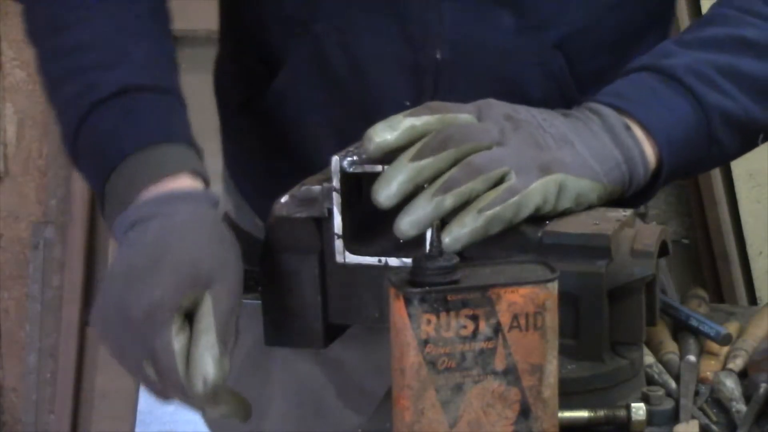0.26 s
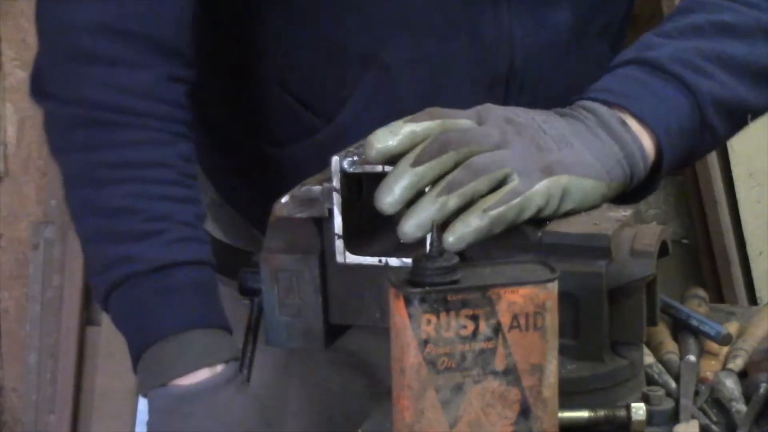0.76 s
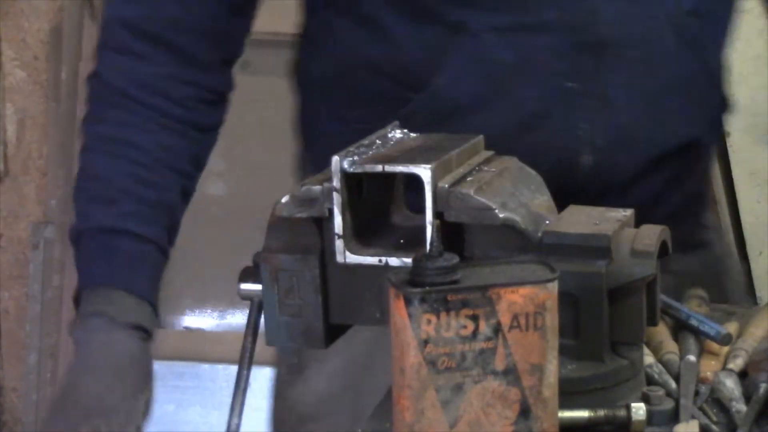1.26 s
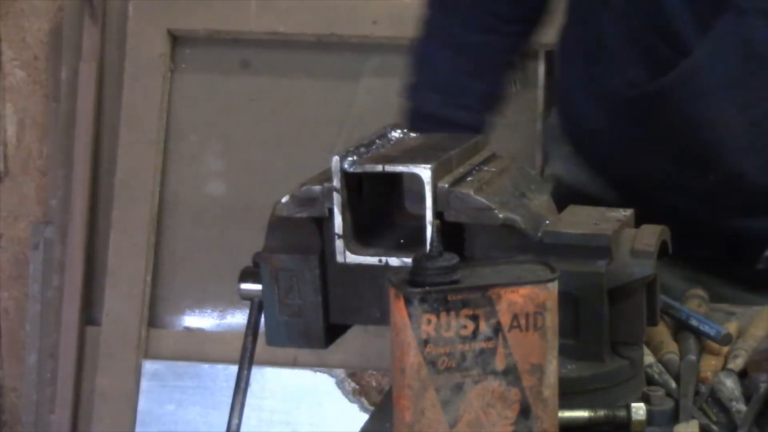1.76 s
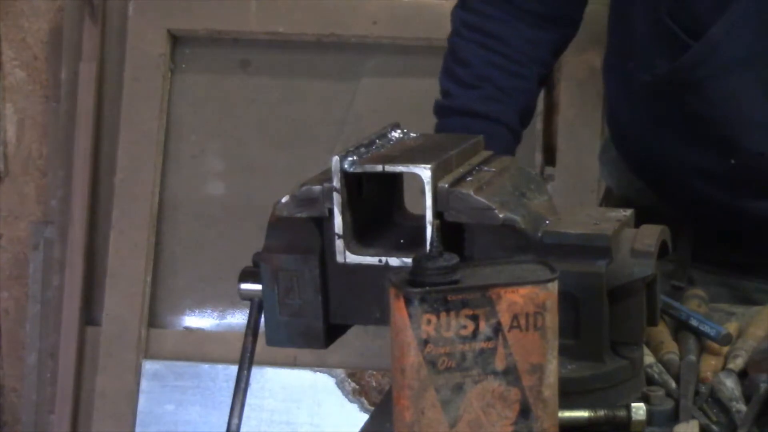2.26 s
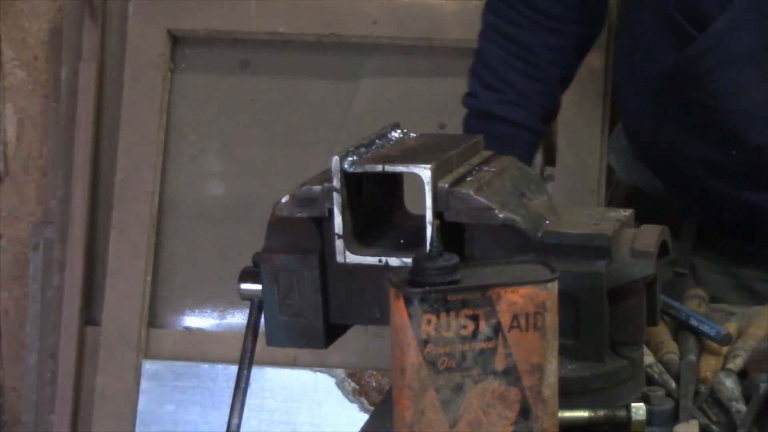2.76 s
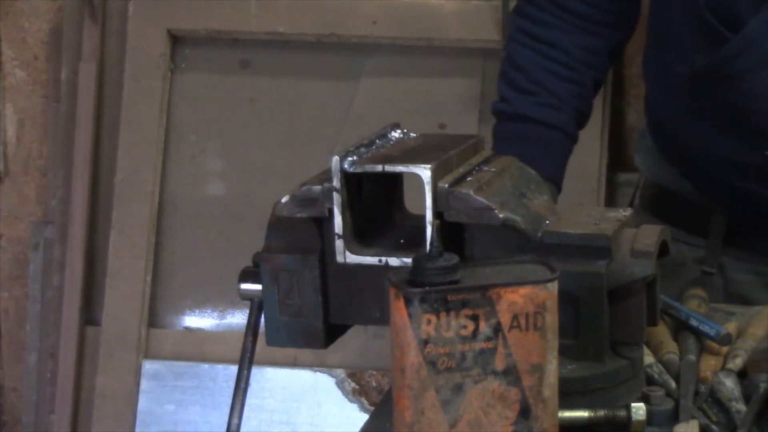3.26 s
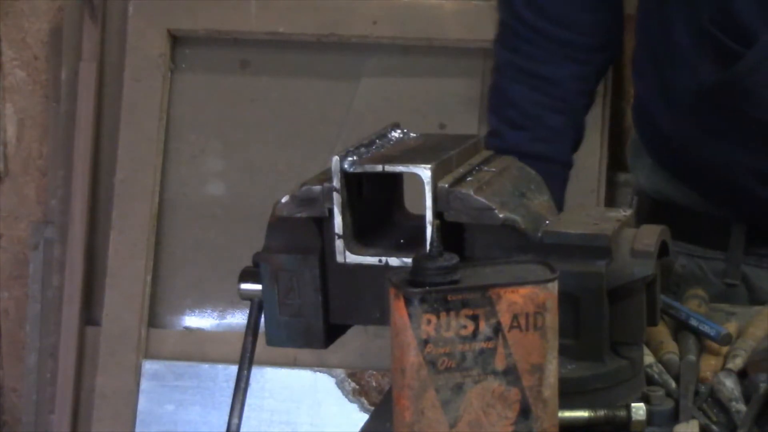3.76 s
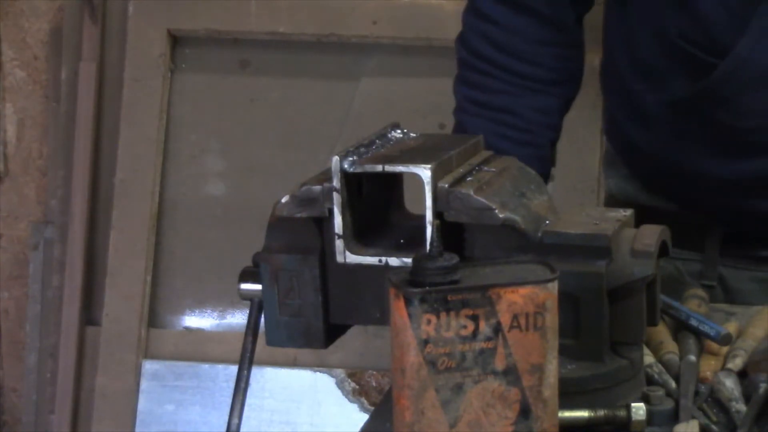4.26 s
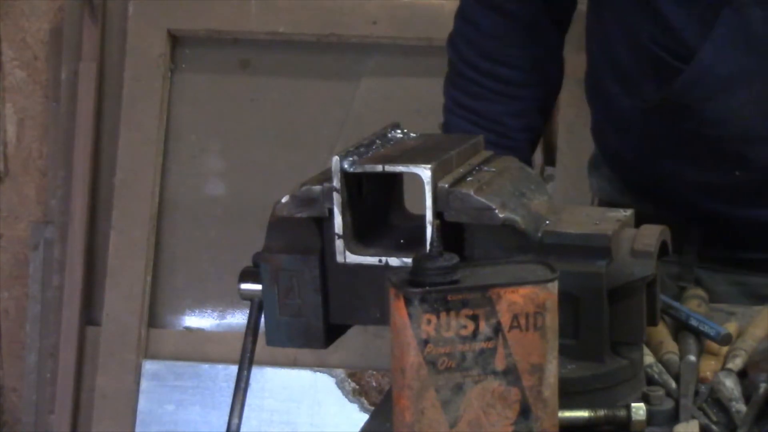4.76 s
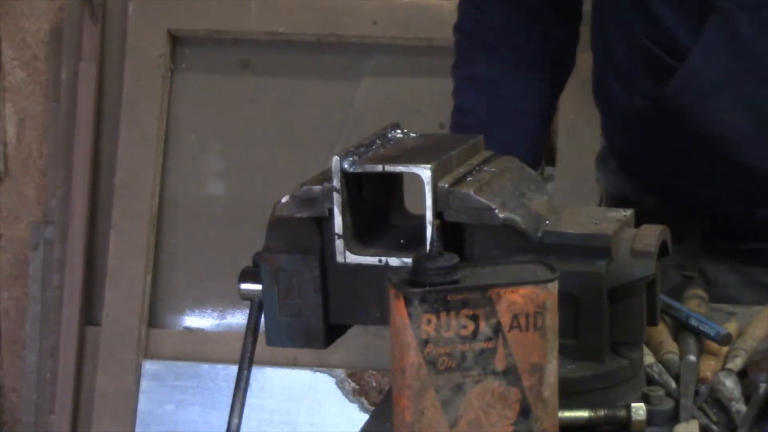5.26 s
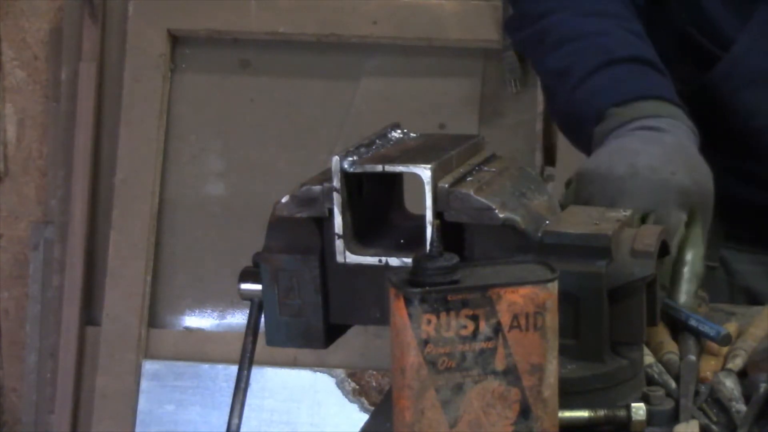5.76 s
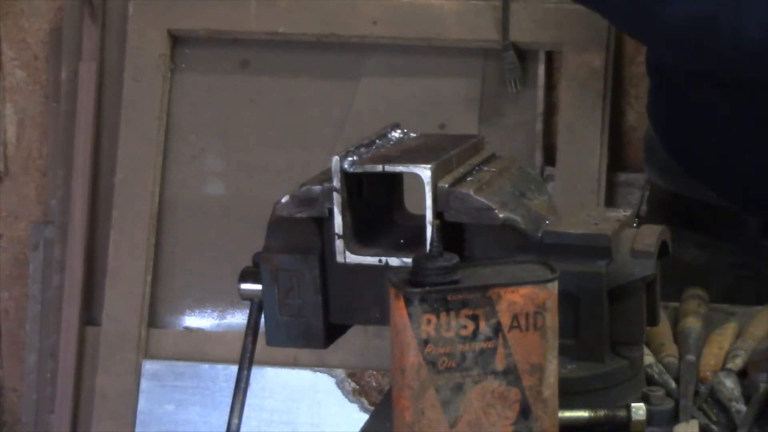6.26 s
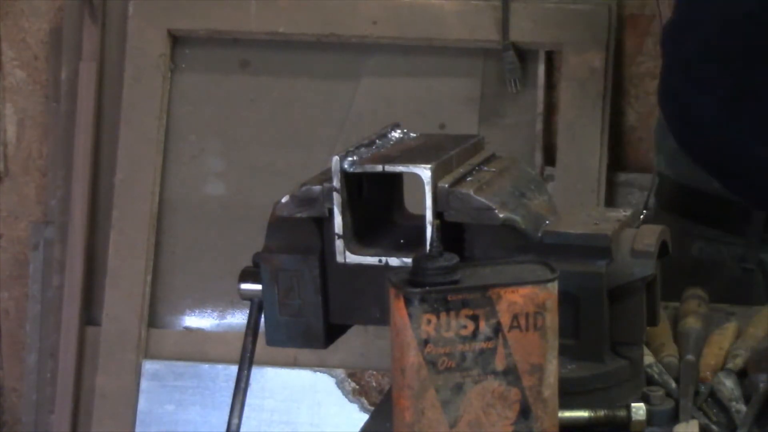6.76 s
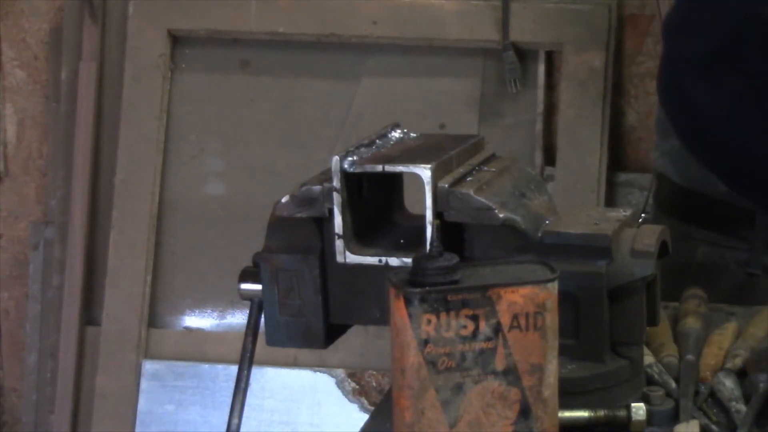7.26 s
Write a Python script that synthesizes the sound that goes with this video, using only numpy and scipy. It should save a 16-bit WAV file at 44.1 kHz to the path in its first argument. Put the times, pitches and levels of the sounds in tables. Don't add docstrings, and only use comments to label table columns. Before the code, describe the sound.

Faint rustles and ticks, then knocks on a wooden bench, a ringing tool set down, and a heavy crash of metal offcuts at the end.

```python
import sys
import numpy as np
from scipy import signal
from scipy.io import wavfile

SR = 44100
rng = np.random.default_rng(int(sys.argv[2]) if len(sys.argv) > 2 else 0)


def master(y):
    cut = np.clip(np.atleast_2d(y).T, -1, 1)
    pcm = np.round(cut * 32767)
    wavfile.write(sys.argv[1], SR, pcm.astype(np.int16))


def volts_from_db(level):
    exponent = np.asarray(level, float) / 20
    return 10 ** exponent


N = 331191


def at_hz(points, hz):
    f, value = np.array(points)[:, 0], np.array(points)[:, 1]
    return np.interp(np.log(hz), np.log(f), value)


def blend(zones_hz, columns, hz):
    shares = [np.interp(np.log(hz), np.log(zones_hz), row) for row in np.eye(len(columns))]
    return sum(share * column for share, column in zip(shares, columns))


def fine_colour(points, zones_hz, hz):
    return at_hz(points, hz) - blend(zones_hz, at_hz(points, zones_hz), hz)


def rms_one(x):
    return x / np.sqrt(np.mean(x ** 2) + 1e-20)


def drift(rate):
    step = int(SR / rate / 2)
    knots = rng.standard_normal(N // step + 2)
    return np.interp(np.arange(N) / step, np.arange(len(knots)), knots)


def ring(x, hz, t60):
    r, w = volts_from_db(-60 / (t60 * SR)), 2 * np.pi * hz / SR
    return signal.lfilter([0, np.sin(w)], [1, -2 * r * np.cos(w), r * r], x + 1e-18)


def contacts():
    # t/s, level/dB, brightness/dB, sharpness of the first crack/dB
    thumps = [
        (2.337, -30, -14, 9.5),
        (3.245, -31, 2, 2),
        (3.915, -36, 0, -12),
        (4.076, -36.5, -6, -14),
        (4.245, -37.5, 0, 5),
        (7.014, -3.5, 1, -9),
        (7.151, -24, 26, -3),
    ]
    knocks = [(0.317, -34.5, 9, 0), (1.892, -15, 3.5, -15), (2.717, -8.5, -5, 6), (3.428, -24, 3, 7),
              (3.68, -18.5, -5.5, 8.5), (4.95, -22.5, 9, 4.5), (5.439, -28.5, 2, 8.5), (6.632, -40, -22, 9),
              (6.879, -23.5, 12, -2), (6.938, -15.5, 1, -4), (7.084, -12, -2.5, 8.5),
              (7.324, -14, -14, 6.5), (7.363, -10, 10.5, 11.5), (7.432, -7, 0, 1)]
    raps = [(1.456, -35, 10.5, -9), (2.503, -34.5, 7, -3), (3.123, -28, -13, -5), (3.131, -28, 0, 5),
            (3.482, -21.5, -9, -8), (5.027, -25, -2, -14), (5.082, -20, -7, 4), (5.203, -20.5, 3, 9.5),
            (5.4, -34, 0.5, 1), (5.657, -33.5, -8, -10), (6.815, -18.5, -14, 4.5), (6.963, -13.5, 7, 7),
            (6.991, 4, -19, 3), (7.262, -27.5, 5.5, 1)]
    clanks = [
        (0.22, -27, -6, 6.5),
        (0.819, -33, -11, 8.5),
        (1.164, -34.5, -8.5, -6),
        (3.321, -40.5, 2, -2),
        (3.573, -32, 10.5, 10),
        (4.974, -22, 10.5, -5),
        (6.904, -18, -6, 5),
        (7.458, -17.5, -1.5, 12),
        (7.493, -28, -8, 8),
    ]
    ticks = [(1.527, -35, -7, -14), (2.522, -36.5, 2, -7), (5.586, -50, 1, 5), (6.059, -56, 12.5, 4),
             (6.101, -53, 7, 10), (6.136, -55, 0, 4), (6.7, -57, 10.5, -8), (6.878, -41, 8, 3),
             (6.815, -50, 10, 8), (.185, -56, 8, 3), (7.4535, -30.5, 7, 9), (7.012, -36.5, 5, 7),
             (2.644, -43.5, 5, 2), (7.288, -23, -2.5, 8), (7.301, -19.5, -2.5, 7.5)]
    thump_db = [0, -11.5, -43, -41]
    knock_db = [-10, 0, -15, -21.5]
    rap_db = [-20.5, -0.5, -12, -23]
    clank_db = [-8, -6, -3, -13]
    tick_db = [-11.5, -3, -1.5, -1]
    bright_shares = np.array([-0.057, 0.022, 0.45, 0.98])
    kinds = ((thumps, thump_db), (knocks, knock_db), (raps, rap_db), (clanks, clank_db), (ticks, tick_db))
    table = []
    for rows, kind_db in kinds:
        for s, db, bright_db, sharp_db in rows:
            zone_db = db + np.array(kind_db) + bright_db * bright_shares
            table.append((s, sharp_db, *zone_db))
    return np.array(table)


def knock_envelope(hz, early_s, rise_cycles):
    zones_hz = [200, 800, 2800, 8000]
    # f/Hz, level/dB per Hz
    knock_colour = [(60, -40), (110, -11.5), (170, 0.5), (350, 6), (800, 0.5), (1400, -6.5), (2200, -15.5),
                    (4500, -22), (8000, -22), (12000, -33.5), (15500, -60)]
    # f/Hz, t60/s
    tail_t60 = [(100, 0.58), (260, 0.29), (700, 0.29), (1800, 0.29), (5000, 0.36), (12000, 0.09)]
    table, out, t = contacts(), np.zeros(N), np.arange(SR // 3) / SR
    level_db = blend(zones_hz, table[:, 2:].T, hz) + fine_colour(knock_colour, zones_hz, hz)
    sharp_db = table[:, 1]
    rise = 1 - np.exp(-t * hz / rise_cycles)
    tail = (volts_from_db(-60 * t / at_hz(tail_t60, hz)) * rise) ** 2
    burst = np.exp(-2 * t[:1000] / (early_s + 0.62 / hz))
    starts = (table[:, 0] * SR).astype(int)
    for i, power, hard in zip(starts, volts_from_db(2 * level_db), volts_from_db(2 * sharp_db)):
        out[i:i + len(t)] += power * tail[:N - i]
        out[i:i + 1000] += power * hard * burst[:N - i]
    return np.sqrt(out)


def struck(body, level_db, damping):
    blows, modes = body
    at, out = [int(s * SR) for s, db in blows], np.zeros(N)
    blow_db = np.array(blows)[:, 1]
    luck = rng.standard_normal((len(blows), 30))
    for k, (hz, mode_db, t60) in enumerate(modes):
        clicks = np.zeros(N)
        clicks[at] = volts_from_db(blow_db + mode_db + level_db + 2.0 * luck[:, k]) * (-1) ** k
        out += ring(clicks, hz, np.clip(t60 * damping, .02, .9))
    return out


def wood():
    # (f/Hz, level/dB, t60/s)
    board = [(1.892, -13), (3.681, -20.5), (5.44, -24.5)], [(189, -6, 0.35), (497.5, 1.5, 0.18),
             (540, -1, 0.3), (565, -6.5, 0.59), (625, -9, 0.19), (890, -19, 0.33), (1034, -7, 0.12)]
    drawer = [(2.334, -31.5), (2.7165, -5.5)], [(209.6, -4.5, 0.39), (313.2, -1.5, 0.54), (383, 2, 0.24),
              (543, -3.5, 0.2), (624, -3, 0.24), (980, -12, 0.19), (1360, -14, 0.23), (1453, -1.5, 0.076),
              (452, -6, 0.2), (270, -2, .3)]
    bench = [(6.992, 0), (7.084, -31), (7.362, -6), (7.436, -17)], [(149.6, -22, 0.95), (324.6, 3, 0.46),
             (644, 1.5, 0.21), (997, 1, 0.17), (1086, -5, 0.54), (1317, 3, 0.083), (1450, -4, 0.25),
             (1480, -5, 0.38), (767, 3.5, 0.25), (1567, -10, 0.31), (2022, -15, 0.79)]
    block = [(3.131, -29), (6.815, -14.5)], [(1054, 4, 0.071), (1310, 5.5, 0.047), (1540, -1, 0.099),
             (2010, -4, 0.05)]
    frame = [(2.716, -24), (5.084, -30.5), (6.99, -6), (7.362, -17.5)], [(93.2, -14.5, 0.89),
             (152, -12, 0.96), (186, -10, 0.34)]
    out = struck(board, level_db=-11.0, damping=0.62)
    out += struck(drawer, level_db=-14.0, damping=0.64)
    out += struck(bench, level_db=-14.5, damping=0.41)
    out += struck(block, level_db=-8.5, damping=0.21)
    out += struck(frame, level_db=-5.0, damping=0.58)
    return out


def steel():
    # (f/Hz, level/dB, t60/s)
    spanner = [(4.9511, -24), (4.9736, -5), (5.028, -14.5), (5.0833, -35)], [(470, -4.5, 0.098),
               (865, -7, 0.22), (1441, -0.5, 0.2), (2013, -10, 0.37), (3050, -2, 0.059), (3190, -7.5, 0.23),
               (4100, -5.5, 0.11), (4200, -9, 0.15), (5300, -15, 0.22), (5970, -11, 0.16),
               (6620, -11.5, 0.11), (8600, -22, 0.14)]
    rod = [(3.4286, -21.5)], [(980, 5, 0.077), (2065, 1, 0.3), (3750, -19, 0.12), (4540, -15, .06),
           (5850, -12, 0.07), (6320, -11, 0.064)]
    plate = [(3.5743, -22.5)], [(3200, -2.5, 0.18), (3930, -1.5, 0.13), (4883, -1.5, 0.16), (5060, -7, .2),
             (5900, -9, .1), (7030, -2, 0.07)]
    offcuts = [(6.9052, -17.5), (6.9636, -12), (7.2883, -14), (7.2998, -6.5), (7.3627, -2.5),
               (7.4594, -17)], [(2970, -9, 0.1), (3980, -0.5, 0.038), (4900, -12, 0.053),
               (5740, -1.5, 0.054), (6210, -7, 0.067), (6740, -7.5, 0.038), (7800, -9, 0.036)]
    socket = [(0.2209, -40.5), (2.507, -43), (2.5202, -33.5)], [(2870, -6, 0.33), (3010, 0, 0.27),
              (4200, -2, 0.26), (5330, -1.5, 0.21), (7670, -8, .15)]
    bolt = [(5.205, -17.5)], [(1133, -0.5, 0.12), (2154, -2, 0.063), (3160, -9, 0.15), (4290, -13, 0.1),
            (865, -4, 0.13)]
    washer = [(5.5852, -44)], [(2320, -1, 0.12), (4150, -1, 0.13), (5350, -5, .15)]
    pipe = [(5.045, -37)], [(3722, 0, 2.0), (3738, -10, .6), (3200, -11, .5)]
    out = struck(spanner, level_db=-17.0, damping=0.67)
    out += struck(rod, level_db=-12.0, damping=0.92)
    out += struck(plate, level_db=-8.0, damping=0.35)
    out += struck(offcuts, level_db=-12.5, damping=0.37)
    out += struck(socket, level_db=-12.0, damping=0.56)
    out += struck(bolt, level_db=-7.5, damping=0.44)
    out += struck(washer, level_db=-8.5, damping=0.68)
    out += struck(pipe, level_db=-3.5, damping=0.7)
    return out


def juddering_box():
    # (f/Hz, level/dB, t60/s)
    box = [(7.325, -13), (7.349, -17), (7.392, -11), (7.407, -12.5), (7.432, -14), (7.442, -14),
           (7.452, -11)], [(437, 1.5, .06), (245, -6, .08), (540, -3, .06)]
    return struck(box, level_db=-2.5, damping=0.97)


def pings():
    # t/s, f/Hz, peak level/dB, t60/s
    small_rings = [(.8195, 2860, -39, .03), (0.82, 1760, -42, .03), (.8195, 2560, -38, .04),
                   (.8195, 4900, -43, 0.027), (0.8197, 410, -43, 0.07), (2.337, 470, -37.5, .15),
                   (2.529, 8900, -48, .05), (2.529, 7520, -46, .12), (2.645, 12200, -54, .06),
                   (2.529, 11000, -50, .03), (2.648, 8000, -47, .05), (2.65, 10500, -50, .05),
                   (2.702, 1396, -27, .05), (2.7013, 3020, -34, .03), (2.7165, 2740, -22, 0.023),
                   (2.8011, 3417, -37.5, 0.071), (3.444, 1500, -43, .06), (3.505, 893, -28.5, 0.04),
                   (3.507, 3750, -38, 0.046), (3.64, 956, -40, .1), (3.682, 6000, -41, .03),
                   (3.575, 4950, -35, .12), (4.95, 1460, -32, .06), (5.028, 1466, -30, .1),
                   (5.028, 3070, -30, .05), (5.025, 5970, -39, .1), (5.199, 3700, -30, .03),
                   (5.036, 880, -29, 0.13), (5.083, 1096, -25, 0.047), (5.403, 1650, -44, .06),
                   (5.441, 603, -29.5, 0.055), (5.442, 2800, -43, .02), (5.442, 4900, -42, .02),
                   (5.442, 5950, -51, .02), (5.672, 2330, -46, .06),
                   (6.8917, 2200, -34, .05), (6.897, 3080, -38, .05), (6.907, 4200, -31, .04),
               (6.918, 3700, -28, .03), (6.915, 6900, -39, 0.063), (6.955, 5700, -33, .06),
               (6.972, 6100, -28, .02), (6.9905, 2930, -19.5, .02), (6.9905, 4100, -24, .02),
               (7.012, 8000, -34, 0.044), (7.012, 6300, -30, .04), (7.263, 1060, -32.5, .06),
               (7.3002, 4700, -20, 0.046), (7.305, 1480, -22, 0.045), (7.308, 5800, -27.5, 0.054),
               (7.366, 6320, -17, 0.045), (7.363, 8200, -29, .04), (7.454, 6130, -26, 0.043),
               (7.4597, 2710, -21, .05), (7.4924, 3500, -24, .04), (7.4924, 1930, -24.5, .04)]
    spacing = .013
    out, t = np.zeros(N), np.arange(SR // 4) / SR
    for s, hz, level_db, t60 in small_rings:
        i = int(s * SR)
        cluster = 0
        for k, gain in ((-1.6, .35), (0, .5), (1, .35)):
            cluster = cluster + gain * np.sin(2 * np.pi * hz * (1 + spacing * k) * t)
        decay = volts_from_db(level_db - 60 * t / np.clip(t60, .01, .12))
        out[i:i + len(t)] += (decay * cluster)[:N - i]
    return out


def rattle(per_s, cycles, quiet_db, level_db):
    knocked = volts_from_db(-4.0) * knock_envelope(4500, early_s=0.0014, rise_cycles=29.0)
    shaking = volts_from_db(sliding()[2]) + knocked
    shaking = np.maximum(shaking - volts_from_db(quiet_db), 0)
    happens = rng.random(N) < per_s / SR
    sizes = volts_from_db(2.2 * np.minimum(rng.exponential(1, N), 3)) * shaking * happens
    dealt = rng.integers(0, 30, N)
    pitches = np.geomspace(1500, 13000, 30) * volts_from_db(.3 * rng.standard_normal(30))
    out = np.zeros(N)
    for k, hz in enumerate(pitches):
        out += ring(sizes * (dealt == k), hz, cycles / hz) * (3000 / hz) ** 0.4
    return volts_from_db(level_db) * out


def sliding():
    # t/s, length/s, level/dB, weight/dB, brightness/dB
    slides = [(0.24, .28, -58, -8, 19), (0.59, 0.17, -65, -6, 24.5), (0.809, 0.13, -48.5, -16, 16),
              (2.475, 0.17, -35, 2, 2), (2.573, 0.15, -34.5, -9, -2), (2.76, 0.09, -51, 7, 1),
              (3.09, 0.21, -49.5, 9, 3), (3.254, 0.12, -49, 1, 7), (3.452, .14, -32.5, -3.5, 3),
              (4.879, 0.082, -39.5, -8, 2), (5.018, 0.076, -35, -2, -11), (5.083, 0.14, -44.5, 10.5, 10),
              (5.5, 0.14, -56, 3, 13.5), (6.66, 0.27, -60, 1, 18), (6.88, 0.17, -22.5, -4, -4.5),
              (7.06, 0.14, -38.5, 0, -2), (7.14, 0.13, -48.5, 7, 8), (7.371, 0.1, -34, 15, 10)]
    # t/s, level/dB
    stir = [
        (0, -55),
        (1.6, -54),
        (3.9, -57),
        (5.2, -60),
        (7.51, -57),
    ]
    swell_share, swell_db, let_go_db_per_s, hiss_db = 0.66, 23, 197, -15.5
    t = np.arange(N) / SR
    stir_s, stir_db = np.transpose(stir)
    power = volts_from_db(2 * (np.interp(t, stir_s, stir_db) + np.array([[1], [0], [hiss_db + 0.7]])))
    for s, length, db, weight_db, bright_db in slides:
        near = slice(max(int((s - .1) * SR), 0), int((s + length + .4) * SR))
        rise_db = swell_db * np.minimum((t[near] - s) / (swell_share * length) - 1, 0)
        shape_db = rise_db - let_go_db_per_s * np.maximum(t[near] - s - length, 0)
        zone_db = np.array([[weight_db], [0], [hiss_db + bright_db]])
        power[:, near] += volts_from_db(2 * (db + shape_db + zone_db))
    return 10 * np.log10(power)


def rubs():
    # t/s, length/s, f/Hz,
    # width/Hz, level/dB
    creaks = [(1.015, .1, 505, 45, -45), (1.015, .12, 345, 50, -44), (1.08, .12, 460, 40, -47),
              (1.12, .08, 298, 30, -50), (.29, .05, 10300, 700, -55), (.305, .045, 8300, 600, -57),
              (2.63, .075, 860, 80, -34.5), (5.655, .07, 750, 200, -44), (1.5, .4, 4100, 150, -71),
              (7.32, .17, 430, 120, -29), (.56, .1, 290, 50, -53), (2.64, .03, 6400, 300, -53),
              (0, 7.5, 158, 25, -63), (3.12, .07, 165, 40, -48), (3.92, .07, 165, 40, -52),
              (5.44, .1, 170, 40, -49), (5.24, .07, 180, 40, -47.5), (5.44, .08, 390, 90, -41)]
    scuffs = [(5.17, 0.035, 1200, 1400, -39), (5.196, 0.009, 5800, 6000, -43),
              (4.9, 0.088, 6400, 8000, -50), (.87, 0.098, 4400, 4100, -49), (.98, 0.077, 4300, 4000, -51),
              (3.48, 0.1, 4900, 9100, -45), (1.3, 0.19, 2400, 5500, -57), (1.0, 0.043, 6000, 6200, -58),
              (0.853, 0.25, 3200, 1200, -57.5), (5.67, 0.052, 2600, 2300, -51.5),
              (6.1, 0.094, 10500, 5500, -56), (.3, .25, 3000, 2500, -58), (.63, .17, 3500, 1500, -60),
              (5.6, .08, 10000, 6000, -62), (6.93, 0.033, 1440, 1600, -26.5)]
    out, white = np.zeros(N), rng.standard_normal(N)
    for s, length, hz, width_hz, level_db in creaks + scuffs:
        i, n = int(s * SR), int(length * SR)
        t60 = np.log(1000) / np.pi / width_hz / 1.5
        tone = rms_one(ring(ring(white[i:i + n], hz, t60), hz, t60))
        out[i:i + n] += volts_from_db(level_db) * tone * signal.windows.tukey(len(tone), .5)
    return out


def bench_noise():
    slide_zones_hz = [250, 1400, 6500]
    # f/Hz, level/dB per Hz
    slide_colour = [(35, -59), (60, -30), (167, -2.5), (738, -4), (849, -4), (1120, -12), (1420, -9.5),
                    (2650, -17.5), (3670, -18), (7030, -25.5), (13000, -35), (15500, -50)]
    room = [(15, -57), (25, 4), (86, 1.5), (165, -20), (241, -36), (269, 2.5), (473, -4.5), (729, -11),
            (929, -2.5), (1390, -11), (2030, -20.5), (5670, -23), (15800, -33)]
    # f/Hz, side minus mid level/dB
    width = [(60, -30), (250, -22), (500, -13.5), (1000, -17.5), (2500, -16.5), (4500, -13), (8000, -17.5),
             (14000, -36)]
    slides, out, edges = sliding(), 0, 28 * 2 ** np.arange(0, 9.6, .5)
    white = rng.standard_normal((2, 3, 2, N))
    grit_db = 1.06 * drift(150) + 1.3 * drift(45)
    room_power = sum(volts_from_db(at_hz(room, hz)) ** 2 * .35 * hz for hz in edges[:-1] * 1.19)
    for k, (low, high) in enumerate(zip(edges, np.minimum(edges[1:], .45 * SR))):
        hz = np.sqrt(low * high)
        knock = volts_from_db(-14.0 + 2.1 * drift(40)) * knock_envelope(hz, early_s=0.003, rise_cycles=1.43)
        slide_db = blend(slide_zones_hz, slides, hz) + fine_colour(slide_colour, slide_zones_hz, hz)
        slide = volts_from_db(slide_db - 9.5 + 2.0 * drift(14) + grit_db * (hz / 2000) ** 0.19)
        floor = volts_from_db(-59.5 + at_hz(room, hz) + 1.4 * drift(11)) * np.sqrt(0.62 * hz / room_power)
        narrow = volts_from_db([[0], [-5.0 + 8.7 * min(np.log2(hz / 2000), 0)]])
        mixed = narrow * (knock * white[k % 2, 0] + slide * white[k % 2, 1])
        mixed = mixed + floor * white[k % 2, 2]
        band = signal.butter(2, [low, high], "band", fs=SR, output="sos")
        mid, side = signal.sosfilt(band, mixed) / np.sqrt(2 * (high - low) / SR)
        out = out + mid + volts_from_db(at_hz(width, hz) + 7.0) * side * [[1], [-1]]
    return out


def walls(x, t60):
    t = np.arange(int(.4 * SR)) / SR
    echo = rng.standard_normal((2, len(t))) * volts_from_db(-60 * t / t60) * (t > .004)
    echo = echo / np.sqrt(np.sum(echo[0] ** 2))
    mid, side = signal.fftconvolve(x[None], echo, axes=1)[:, :N]
    return mid + volts_from_db(-16.0) * signal.lfilter([1, -1], [1, -.7], side) * [[1], [-1]]


def scene():
    near = wood() + steel() + juddering_box() + pings()
    near = near + rattle(per_s=400, cycles=170, quiet_db=-52, level_db=-5) + rubs()
    return near + volts_from_db(-4.0) * walls(near, t60=0.24) + bench_noise()


def top_cut(x):
    return signal.sosfilt(signal.butter(12, 16460, fs=SR, output="sos"), x)


def record(dry):
    x = signal.sosfilt(signal.butter(3, 90, "high", fs=SR, output="sos"), dry)
    x = x - 0.51 * signal.lfilter(*signal.iirpeak(120, 4.0, fs=SR), x)
    hiss = signal.sosfilt(signal.butter(2, 900, fs=SR, output="sos"), rng.standard_normal(N))
    x = x + volts_from_db(-70.5) * rms_one(hiss) * [[1], [-1]]
    x = x * volts_from_db([[.1], [-.1]])
    x = 1.05 * np.tanh(x / 1.05)
    x = signal.sosfilt(signal.cheby2(10, 50, 16200, fs=SR, output="sos"), x)
    return top_cut(x)


dry = scene()
out = record(dry)
master(out)
```